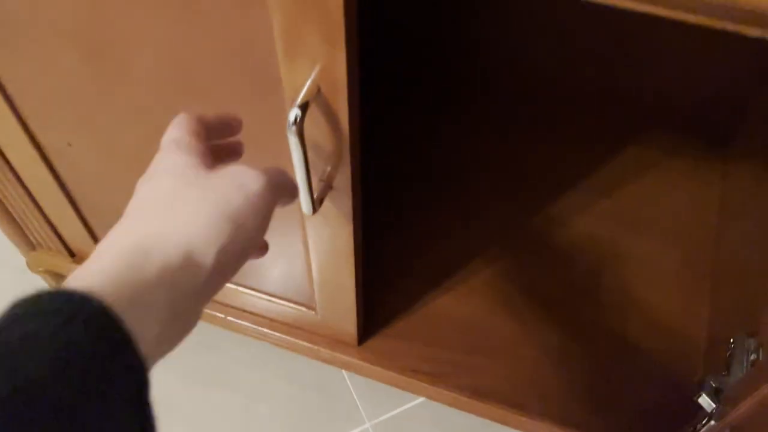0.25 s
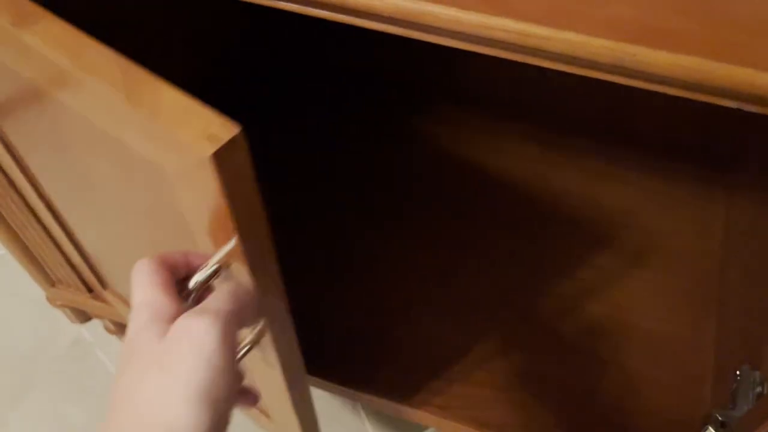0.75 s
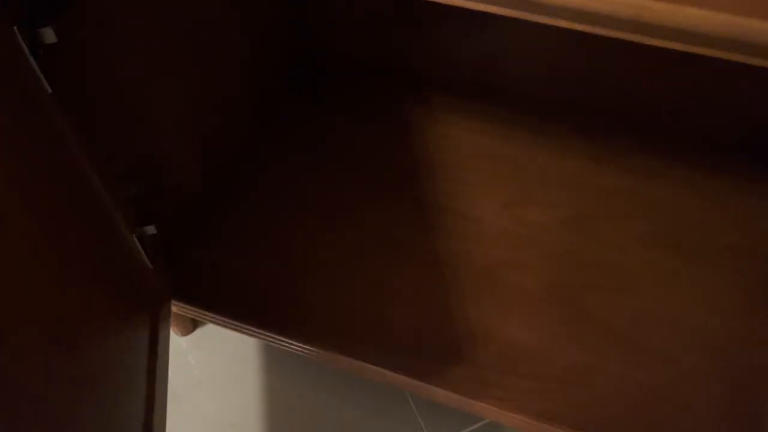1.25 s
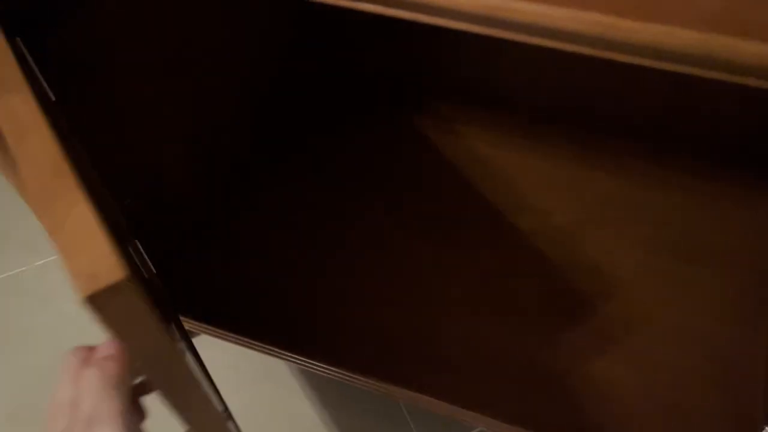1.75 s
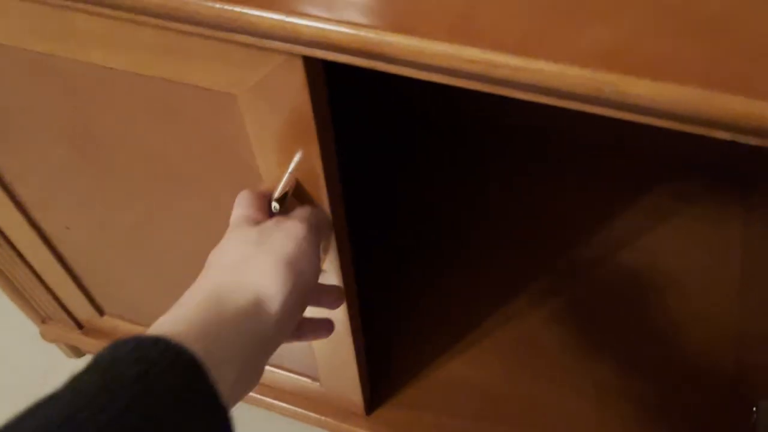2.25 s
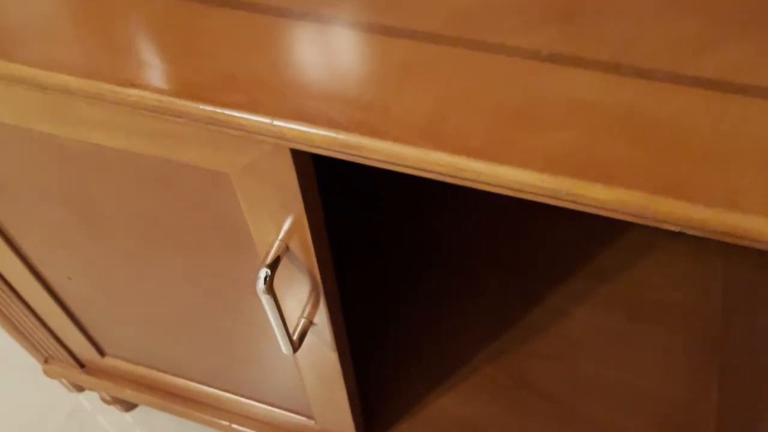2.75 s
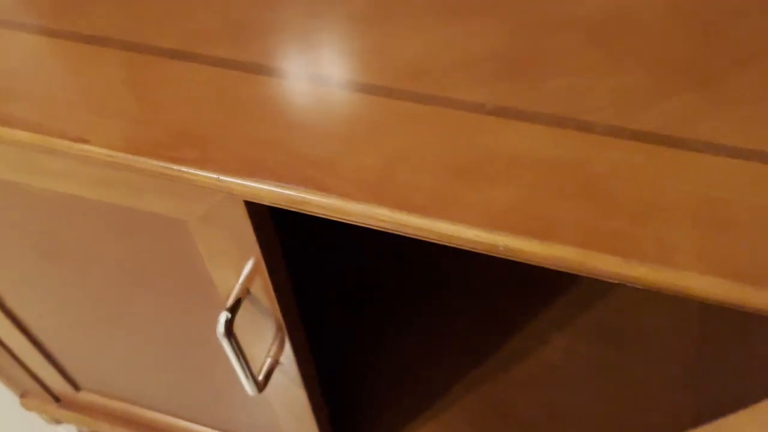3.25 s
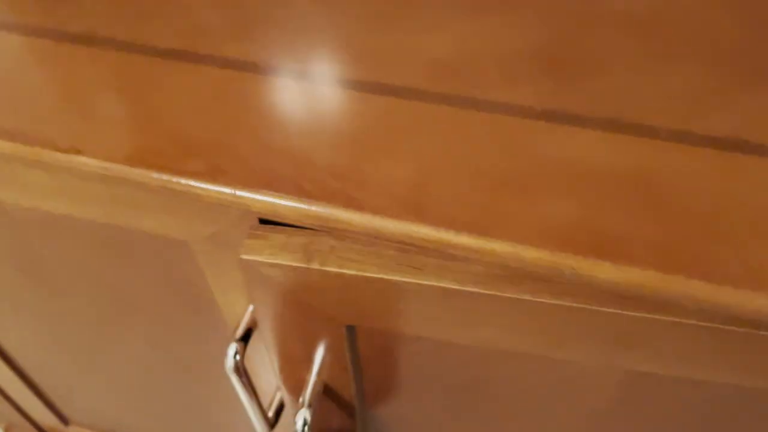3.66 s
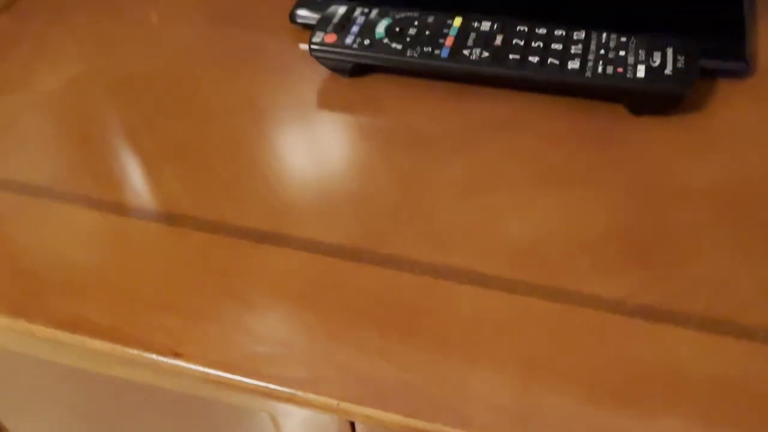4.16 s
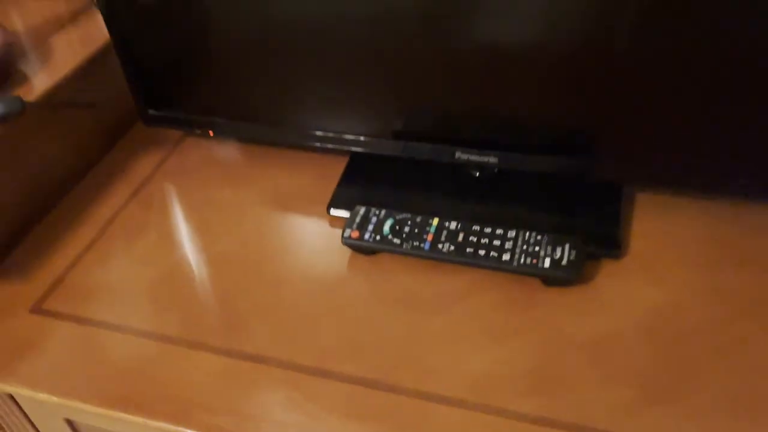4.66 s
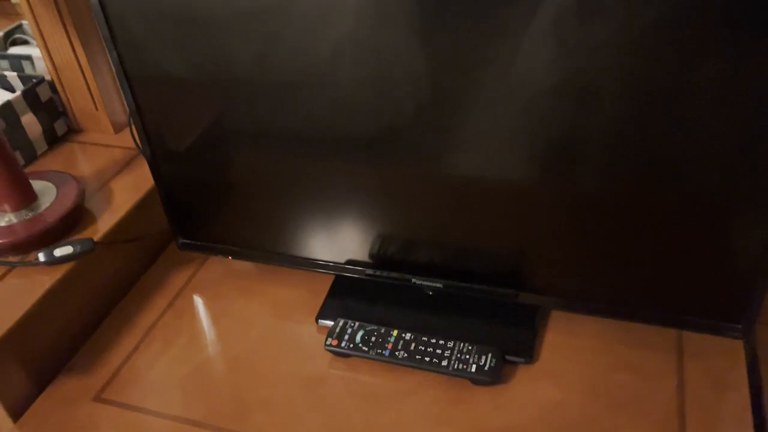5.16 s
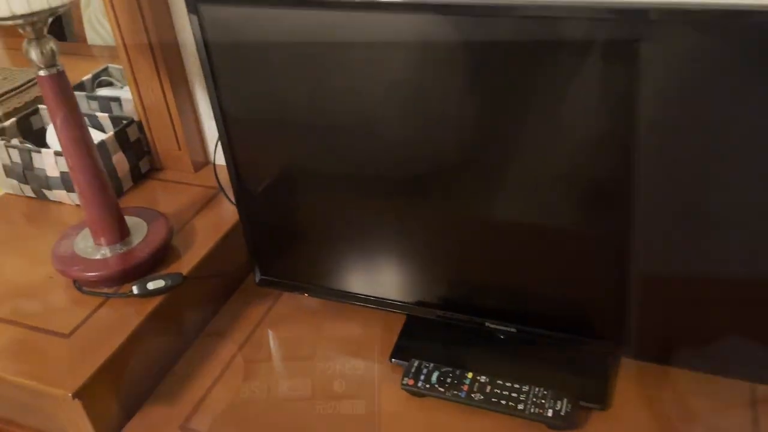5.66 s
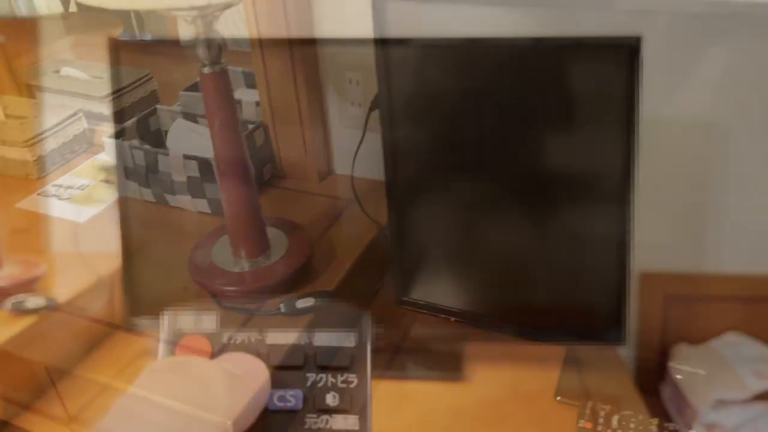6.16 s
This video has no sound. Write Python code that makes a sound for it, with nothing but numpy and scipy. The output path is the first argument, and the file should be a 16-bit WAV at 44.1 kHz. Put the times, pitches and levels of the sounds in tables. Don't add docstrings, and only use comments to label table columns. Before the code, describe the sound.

A quiet small room with low rumble and faint cloth rustle, heard close on a handheld stereo microphone. At about 0.37 s fingers knock softly onto a handle; from 0.5 to 0.85 s a wooden cabinet door is pulled open with a bright catch tick, small knocks and dull scrapes, the sleeve brushing afterward. Soft bumps and ticks come at 1.65-1.75 s. At 2.15 s the door slams, by far the loudest event: dense latch clack, wooden bang, low boxy boom with a softer bounce and short room echo, leaning left. From 2.5 to 3.1 s only stirred air and rustle, with a faint bump near 3.06. The same sequence repeats: grip at 3.5, pull at 3.6-4.0, bumps around 4.8, slam at 5.27. At 5.6 s it cuts to dull fan air, thin whine and swelling low hum, with tiny dry plastic clicks at 5.64, 5.76 and around 6.0 s.

```python
import sys
import numpy as np
from scipy import signal
from scipy.fft import rfft, irfft, next_fast_len
from scipy.io import wavfile
from scipy.ndimage import uniform_filter1d

SR = 44100
rng = np.random.default_rng(int(sys.argv[2]) if len(sys.argv) > 2 else 0)


def invert_db(x):
    u = np.asarray(x, float) / 20
    return 10 ** u


def transcribe(signal):
    frames = np.atleast_2d(signal).T
    limited = np.clip(frames, -1, 1)
    pcm = np.round(limited * 32767).astype(np.int16)
    wavfile.write(sys.argv[1], SR, pcm)


N = 283563
T = np.arange(N) / SR
CUT_S, REPEAT_S = 2.492, 137813 / 44100
JOLT_FALL_DB_PER_S = 331

# frequency in Hz, likeness from 0 to 1.
LIKENESS = [(60, .98), (250, 0.97), (600, 0.064), (1200, 0.41), (2500, 0.15), (5000, 0.12), (7000, 0.33),
            (14000, 1)]
# time the peak is
# reached in seconds, rise in seconds, hold in seconds, level in dB.
PANEL_JOLTS = [(.412, .04, 0.0028, -63), (.5, 0.011, 0.021, -52), (.578, 0.044, 0.011, -47.5),
               (.73, 0.011, 0.017, -39), (.79, .03, .04, -50.5), (.872, 0.073, 0.0045, -46.5),
               (.91, .03, 0.18, -60), (1.385, 0.057, 0.018, -60), (1.504, .05, 0.0052, -55),
               (1.69, 0.074, 0.0075, -54.5), (1.8, 0.059, .03, -65), (1.882, 0.077, .02, -59.5),
               (2.11, 0.12, .025, -58), (2.26, .02, .004, -39.5), (2.31, 0.023, .06, -46.5),
               (2.426, 0.016, 0.072, -54.5)]


def evened(x):
    return x / np.sqrt(np.mean(x ** 2) + 1e-20)


def read(points, hz):
    f, value = np.transpose(points)
    return np.interp(np.log(hz + 1), np.log(f + 1), value)


def add(mix, s, sound):
    part = mix[round(s * SR):][:len(sound)]
    part += sound[:len(part)]


def moves(rows, fall_db_per_s, rest_db, lift_db=0):
    s, rise, hold, db = np.array(rows)[:, :4].T[:, :, None]
    climb = np.minimum(12 * (T - s) / np.maximum(rise, .002), 0)
    fall = fall_db_per_s * np.maximum(T - s - hold, 0)
    return np.maximum((db + lift_db + climb - fall).max(0), rest_db)


def noise(spectrum, patchy_db, count, top=((0, 0), (1, 0))):
    # frequency in Hz, left minus right in dB.
    side_lean = [(60, 0), (240, 2.5), (950, -1), (3770, 2), (15000, -1)]
    frames, hz = count // 256 + 5, np.fft.rfftfreq(1024, 1 / SR)
    a, b, c, d, patches = rng.standard_normal((frames, 513, 5)).T
    patches = uniform_filter1d(patches, size=14, axis=0)
    patches = evened(uniform_filter1d(patches, size=12, axis=1))
    same = np.clip(read(LIKENESS, hz), 0, 1)[:, None]
    left = a + 1j * b
    right = same * left + np.sqrt(1 - same ** 2) * (c + 1j * d)
    lean = invert_db(read(side_lean, hz) / 2)[:, None]
    top_db = np.outer(hz > 8500, np.interp(np.arange(frames) * 256 / SR, *np.transpose(top)))
    level_db = read(spectrum, hz)[:, None] + patchy_db * patches + top_db
    z = np.array([left * lean, right / lean]) * invert_db(level_db)
    return evened(signal.istft(z, nperseg=1024, noverlap=768)[1][:, :count])


def sleeve_rustle():
    # frequency in Hz, level in dB per Hz.
    cloth = [(300, -5.5), (800, -1), (2000, -7.5), (4000, -9.5), (6500, -14.5), (10000, -17), (14000, -13)]
    # time the peak is reached in seconds, rise in seconds, hold in seconds, rustle level
    # in dB, # fine hiss relative to the rustle in dB.
    strokes = [(0, .01, 0.25, -79.5, -13.5), (0.384, .008, .02, -79, -16), (0.495, .03, 0.12, -80.5, -8.5),
               (0.8, 0.0044, 0.0036, -71.5, -13.5), (.84, 0.025, .05, -75.5, -19),
               (.91, .03, 0.017, -75.5, -12), (0.94, .05, 0.094, -75.5, -20),
               (1.058, 0.04, 0.044, -79, -9.5), (1.308, .14, 0.073, -78, -13),
               (1.593, 0.2, 0.17, -78.5, -7.5), (1.828, .1, 0.0084, -77.5, -11),
               (2.3, 0.24, 0.29, -79.5, -15), (2.65, 0.32, 0.435, -75.5, -14)]
    fall_db_per_s, rest_db, rest_hiss_db = 69, -87.5, -8.5
    count = round(REPEAT_S * SR)
    sleeve = moves(strokes, fall_db_per_s, rest_db)
    hiss = moves(strokes, fall_db_per_s, rest_db + rest_hiss_db, np.array(strokes)[:, 4:])
    grain = noise(cloth, 1.9, count=count, top=np.transpose([T, hiss - sleeve + 11.3]))
    return invert_db(sleeve[:count] + 4.5) * grain


def room_rumble():
    # frequency in Hz, level in dB per Hz.
    low_air = [(18, -46), (30, -23.5), (45, -7), (65, 8), (90, -1.5), (120, -7.5), (250, -13), (500, -16),
               (1000, -30), (2500, -37), (6000, -50.5)]
    air_db, follows = -65.5, 0.35
    count = round(REPEAT_S * SR)
    stir = uniform_filter1d(moves(PANEL_JOLTS, JOLT_FALL_DB_PER_S, -68.5), size=6000)
    return invert_db(air_db + follows * (stir[:count] + 62.5)) * noise(low_air, 1.1, count=count)


def scrapes():
    # start in seconds, level in dB, decay in seconds, top frequency in Hz.
    rubs = [
        (0.372, -67, 0.017, 1780),
        (.489, -68.5, 0.018, 1480),
        (.538, -74, 0.018, 5000),
        (0.715, -49.5, 0.026, 485),
        (1.663, -63, .02, 995),
        (2.146, -34.5, 0.033, 3460),
        (2.151, -42, 0.042, 450),
    ]
    t, out = np.arange(8192) / SR, np.zeros(N)
    hz = np.fft.rfftfreq(8192, 1 / SR)
    for (s, db, decay, top_hz), grit in zip(rubs, rng.standard_normal((len(rubs), 8192))):
        colour = (hz > 150) / (1 + (hz / top_hz) ** 4) / np.sqrt(hz + 600)
        rub = evened(irfft(rfft(grit) * colour))
        add(out, s, invert_db(db) * rub * np.exp(-t / decay) * np.minimum(t / .002, 1))
    return out


def ticks(rows, crack_s):
    # frequency in Hz, level in dB per Hz.
    crack_colour = [(300, -11.5), (1000, -0.5), (2500, -8.5), (4000, -7.5), (5200, -20.5), (6500, -12),
                    (11000, -22), (14500, -41)]
    t, out = np.arange(1024) / SR, np.zeros(N)
    hz = np.fft.rfftfreq(1024, 1 / SR)
    for (s, db, ring_hz, width, crack_db), grit in zip(rows, rng.standard_normal((len(rows), 1024))):
        ring = np.sin(2 * np.pi * ring_hz * t) * np.exp(-np.pi * width * t)
        ring *= np.minimum(t / 0.00029, 1)
        crack = evened(irfft(rfft(grit) * invert_db(read(crack_colour, hz)))) * np.exp(-t / crack_s)
        add(out, s, invert_db(db) * ring + invert_db(crack_db) * crack)
    return out


def latch_ticks():
    # start in seconds, peak in dB, ring in Hz, ring width in Hz, crack in dB.
    contacts = [(.373, -82, 1710, 700, -75.5), (.5372, -32, 3400, 1750, -58.5),
                (.545, -68, 2400, 1500, -70.5), (0.8, -44, 11600, 3000, -89), (1.650, -68.5, 2442, 58, -79),
                (1.666, -59.5, 867, 605, -72.5), (2.1295, -53, 1606, 200, -84),
                (2.1340, -50, 1633, 298, -71), (2.1380, -50.5, 1495, 292.6, -76.5),
                (2.1412, -47, 1722, 301.4, -73), (2.1450, -20, 1900, 1200, -44.5),
                (2.1469, -18, 2704, 603, -32), (2.1484, -21.5, 1095, 700, -47),
                (2.1510, -27, 1013, 507.9, -37.5), (2.1546, -14.5, 2574, 604.6, -44.5)]
    return ticks(contacts, crack_s=0.0058)


def knocks(blows, modes, rise_cycles):
    longest_ring_s, damped_hz = .4, 1500
    t, out = np.arange(SR // 2) / SR, np.zeros(N)
    hz, db, t60 = np.transpose(modes)[:, :, None]
    t60 = np.minimum(t60, longest_ring_s / (1 + hz / damped_hz))
    sign = (-1) ** np.arange(len(modes))[:, None]
    for s, blow_db, ms in blows:
        reach = 1 / (1 + (hz * ms / 1000) ** 2)
        rise = 1 - np.exp(-t * hz / rise_cycles)
        ring = sign * invert_db(db - 60 * t / t60) * reach * rise * np.sin(2 * np.pi * hz * t)
        add(out, s, invert_db(blow_db) * ring.sum(0))
    return out


def grip_knocks():
    # frequency in Hz, level in dB, time to die by 60 dB in seconds.
    handle = [(142, 0, 0.16), (276, -11.5, 0.092), (447, -5, 0.12), (560, -34, 0.033), (901, -17, 0.16),
              (1400, -24, 0.08), (1740, -35, .04)]
    # start in seconds, strength in dB, contact in milliseconds.
    grip = [(.3735, -58.5, 0.3), (.383, -45, 0.47), (.394, -56.5, 0.49), (.407, -52.5, 0.67),
            (.428, -72, 1), (.441, -62, 1)]
    return knocks(grip, handle, rise_cycles=2.2)


def shake():
    # frequency in Hz, wander in Hz, level in dB.
    panel_tones = [(96.4, 3.8, -3.5), (117.9, 4.4, 2), (204.6, 8.1, -14.5)]
    still_db = -90.5
    panel = np.zeros(N)
    for (hz, wander, db), row in zip(panel_tones, rng.standard_normal((len(panel_tones), N))):
        drift = evened(uniform_filter1d(row, size=1500))
        panel += invert_db(db) * np.sin(2 * np.pi * np.cumsum(hz + wander * drift) / SR)
    return evened(panel) * invert_db(moves(PANEL_JOLTS, JOLT_FALL_DB_PER_S, still_db) - 5.0)


def pull_knocks():
    # frequency in Hz, level in dB, time to die by 60 dB in seconds.
    catch = [(100, -20, 0.17), (133, -5, 0.082), (182, -7, 0.1), (230.9, -1, 0.36), (274.2, -3.5, 0.21),
             (393.8, -4.5, 0.23), (476.5, -4, 0.14), (700, -16, 0.037), (895, -29.5, 0.055)]
    # start in seconds, strength in dB, contact in milliseconds.
    pull = [(.490, -61, 1.7), (.5385, -56.5, 0.76), (.548, -54.5, 0.28), (.562, -50, 1.3),
            (.7155, -44, 0.73), (.729, -48, 0.69), (.7405, -50, 1.5), (.756, -73, 4.3), (.846, -46, 6.9)]
    return knocks(pull, catch, rise_cycles=0.24)


def push_knocks():
    # frequency in Hz, level in dB, time to die by 60 dB in seconds.
    stop = [(112, -16, 0.15), (216.3, -1.5, 0.14), (270, -2, 0.048), (410.4, -2, 0.12), (527.7, -6, 0.019),
            (630, -7, .06), (830, -17, 0.11), (1163, -19, 0.03)]
    # start in seconds, strength in dB, contact in milliseconds.
    push = [(1.652, -50, 3.7), (1.665, -46.5, 0.5), (1.679, -49.5, 0.3), (1.699, -50.5, .7),
            (1.74, -59, 0.48), (3.058, -53.5, 3.4)]
    return knocks(push, stop, rise_cycles=1.0)


def door_slam():
    # frequency in Hz, level in dB, time to die by 60 dB in seconds.
    door_modes = [(157, -13.5, .12), (200, -4, 0.2), (274.2, -2.5, 0.19), (400.8, -6.5, 0.21),
                  (428.7, -4.5, 0.25), (469, -5.5, 0.16), (544, -15, 0.1), (575, -17.5, 0.17),
                  (636.5, -14, 0.15), (901, -9, 0.26), (936, -21, 0.077), (1167, -4.5, 0.1),
                  (1290, -13.5, 0.1), (1387, -17, .1),
                  (1873, -14, .13), (2111, -12.5, 0.15), (2360, -9, 0.059), (2490, -11, 0.29),
                   (2560, -18, 0.055), (2920, -20, 0.13), (3390, -21, 0.088)]
    # start in seconds, strength in dB, contact in milliseconds.
    blows = [
        (2.1455, -39, 0.29),
        (2.1505, -25.5, 0.42),
        (2.1680, -35, 0.58),
    ]
    return knocks(blows, door_modes, rise_cycles=1.0)


def cabinet_boom():
    # frequency in Hz, level in dB, time to die by 60 dB in seconds.
    carcass = [(115.3, 1.5, .19), (91.8, -1, .19), (62, -18, .2), (36, -20, .2)]
    # start in seconds, strength in dB, contact in milliseconds.
    blows = [
        (2.147, -18, 1.1),
        (2.1904, -25.5, 1.3),
    ]
    return knocks(blows, carcass, rise_cycles=3.2)


def filtered(x, gain):
    size = next_fast_len(N + 4096)
    mirrored = np.concatenate([x, x[..., :-2049:-1]], axis=-1)
    return irfft(rfft(mirrored, size) * gain(np.fft.rfftfreq(size, 1 / SR)), size)[..., :N]


def on_left(x):
    # frequency in Hz, left minus right in dB.
    door_lean = [(60, 0.5), (150, 2), (380, 2.5), (950, 9), (2380, 8), (5970, 0), (15000, -1)]
    return filtered(x, lambda hz: invert_db(np.outer([.5, -.5], read(door_lean, hz))))


def room(x):
    # frequency in Hz, time to die by 60 dB in seconds.
    echo_t60 = [(80, .5), (200, 0.32), (500, 0.22), (1500, 0.37), (4000, 0.23), (7000, 0.25), (9500, 0.14),
                (14000, 0.13)]
    taps = np.zeros((2, SR // 2))
    at = np.arange(100, SR // 2 - 12, 12) + rng.integers(0, 12, (2, (SR // 2 - 101) // 12))
    np.put_along_axis(taps, at, rng.choice([-1., 1.], at.shape), 1)
    hz, t, z = signal.stft(taps, SR, nperseg=512)
    tail = signal.istft(z * invert_db(-60 * t / read(echo_t60, hz)[:, None]), SR, nperseg=512)[1]
    hz = np.fft.rfftfreq(tail.shape[1], 1 / SR)
    close = np.clip(read(LIKENESS, hz), 0, 1)
    both = rfft(tail)
    tail = irfft(close * both[0] + np.sqrt(1 - close ** 2) * both, tail.shape[1])
    return signal.fftconvolve(x[None], tail / np.linalg.norm(tail[0]), axes=1)[:, :N]


def corner_air(count):
    # frequency in Hz, level in dB per Hz.
    fan_air = [(30, -16.5), (60, 0), (150, -7.5), (400, -12), (620, -21.5), (900, -24), (1300, -26),
               (1500, -29.5), (1800, -27), (2300, -38.5), (3100, -40), (4000, -48), (8000, -54),
               (14000, -46)]
    return invert_db(-71) * noise(fan_air, 3.6, count=count)


def fan_whine():
    # frequency in Hz, level in dB.
    fan_lines = [(624.5, -87.5), (1297, -102), (1760, -101), (3130, -109)]
    fan = np.zeros(N)
    for (hz, db), row in zip(fan_lines, rng.standard_normal((len(fan_lines), N))):
        waver = evened(uniform_filter1d(row, size=2500))
        fan += invert_db(db + 4.3 * waver) * np.sin(2 * np.pi * hz * T + .8 * waver)
    return np.sqrt(2) * fan


def mains_hum():
    # frequency in Hz, level in dB.
    hum_lines = [(59.3, -11), (118.6, 1.5)]
    # time the peak is reached in seconds, rise in seconds, hold in seconds, level in dB.
    swells = [(5.63, 0.029, 0.1, -62), (5.87, 0.17, 0.078, -64), (6.075, 0.048, 0.11, -62),
              (6.28, 0.14, 0.11, -63.5)]
    mains = sum(invert_db(db) * np.sin(2 * np.pi * (hz * T + rng.random())) for hz, db in hum_lines)
    return np.sqrt(2) * mains * invert_db(moves(swells, 144, -80))


def handset_clicks():
    # start in seconds, peak in dB, ring in Hz, ring width in Hz, crack in dB.
    clicks = [(5.641, -48, 3130, 1500, -72), (5.754, -74, 2400, 2510, -61.5),
              (5.7668, -45, 2860, 910, -53.5), (5.985, -47, 1886, 1200, -58),
              (6.024, -46.5, 3460, 2000, -64), (6.037, -44.5, 3320, 1967, -65),
              (6.088, -79, 5040, 300, -85), (5.754, -57, 760, 250, -95), (5.985, -60.5, 700, 249, -95),
              (6.038, -64, 625, 150, -95)]
    return ticks(clicks, crack_s=0.00062)


def scene():
    fade_s = .006
    slam = door_slam()
    small = grip_knocks() + pull_knocks() + push_knocks()
    latch = latch_ticks() + scrapes()
    handset = handset_clicks()

    near = cabinet_boom() + slam + small + latch + shake()
    door = on_left(near) + room(invert_db(-4.5) * slam + invert_db(-8.0) * small + invert_db(-6) * latch)
    door *= np.clip(np.maximum(CUT_S - T, T - 3.04) / fade_s, 0, 1)

    corner = fan_whine() + mains_hum() + handset + room(invert_db(-7) * handset)
    corner *= np.clip((T - CUT_S - REPEAT_S) / fade_s, 0, 1)

    start, length = round(REPEAT_S * SR), round(CUT_S * SR)
    last = round((CUT_S + REPEAT_S) * SR)
    background = np.zeros((2, N))
    background[:, :start] = sleeve_rustle() + room_rumble()
    background[:, last:] = corner_air(N - last)

    mix = door + background + corner
    fade_out = np.clip((CUT_S - T[:length]) / fade_s, 0, 1)
    mix[:, start:start + length] = door[:, :length] + background[:, :length] * fade_out
    return mix


def roll_off(x):
    return signal.sosfilt(signal.butter(12, 15590, fs=SR, output="sos"), x)


def record(dry):
    # frequency in Hz, level in dB.
    mic_tone = [(6600, 3.5), (7500, -3), (8000, -9.5), (8500, -20), (9100, 2.5), (9800, 0.5), (13500, -5.5),
                (14800, -17.5), (15600, -55)]
    # frequency in Hz, lead of the left port in radians (negative: the right
    port_lead = [(60, 0), (700, 0.7), (1050, -2.5), (1500, -1), (2000, -7.5), (3500, -5.5), (5000, -5.5),
                 (6000, -7.5), (8500, -9), (11500, -12.5), (14500, -15)]

    def port_gain(hz):
        return invert_db(read(mic_tone, hz)) * np.exp(-1j * np.outer([0, 1], read(port_lead, hz)))

    ports = filtered(dry, port_gain)
    return roll_off(ports)


dry = scene()
out = record(dry)
transcribe(out)
```